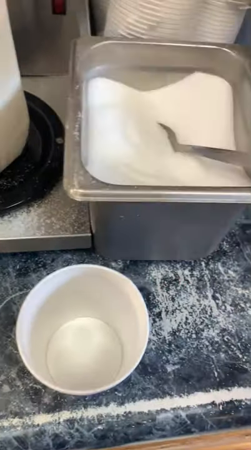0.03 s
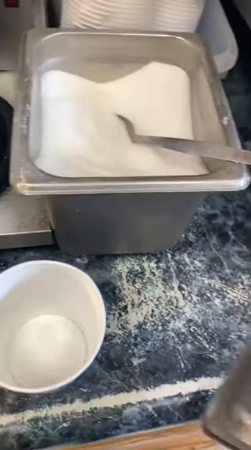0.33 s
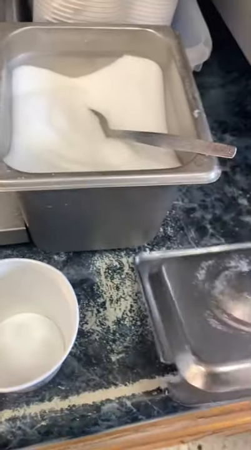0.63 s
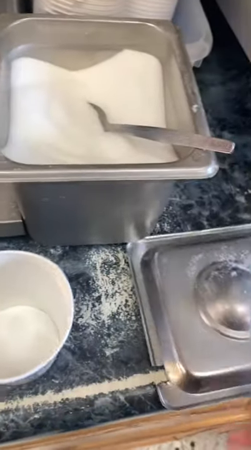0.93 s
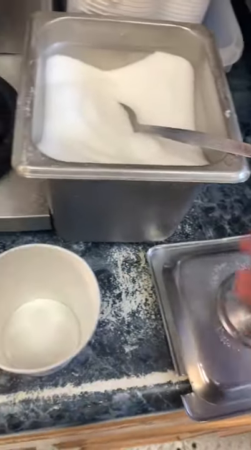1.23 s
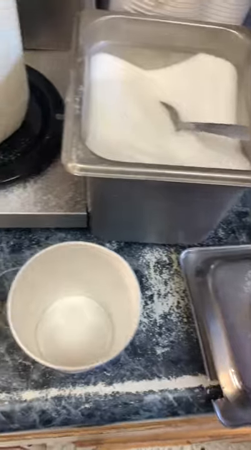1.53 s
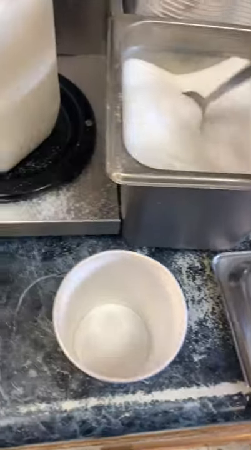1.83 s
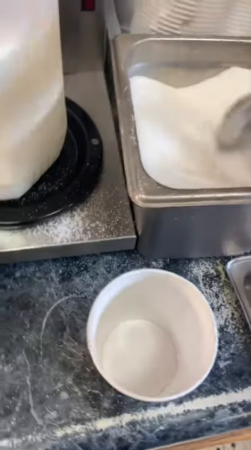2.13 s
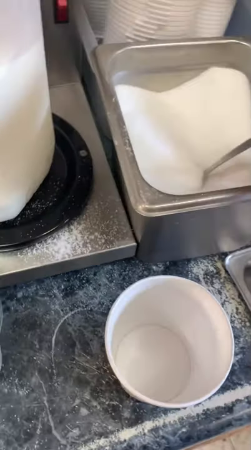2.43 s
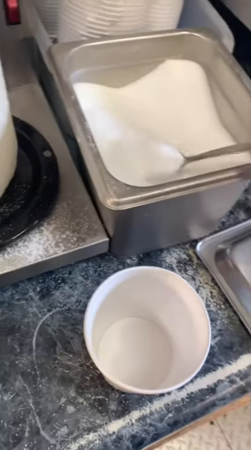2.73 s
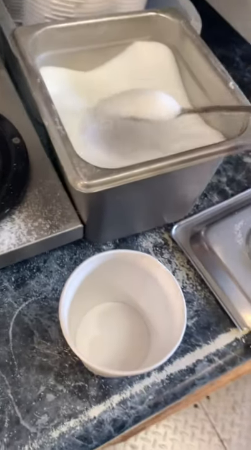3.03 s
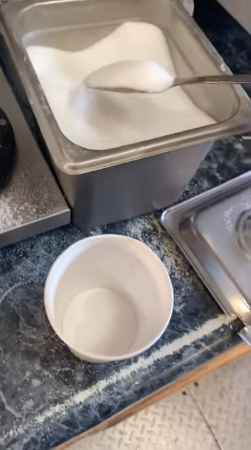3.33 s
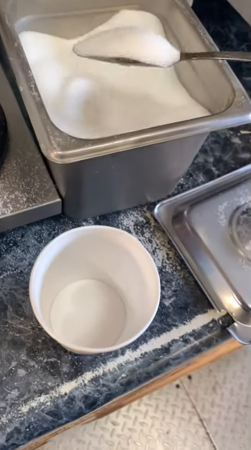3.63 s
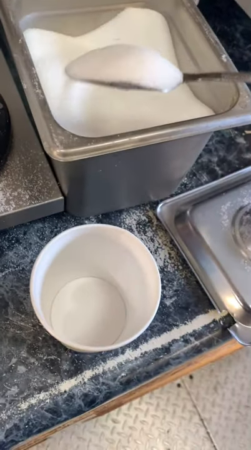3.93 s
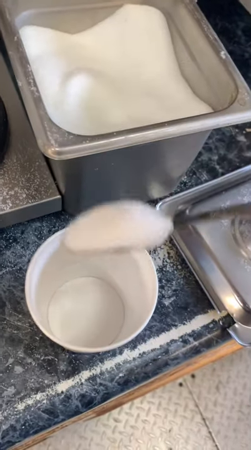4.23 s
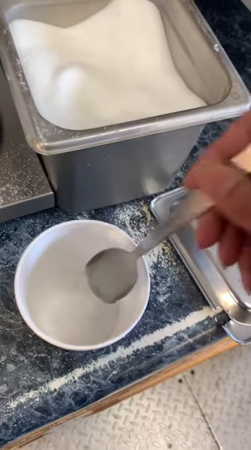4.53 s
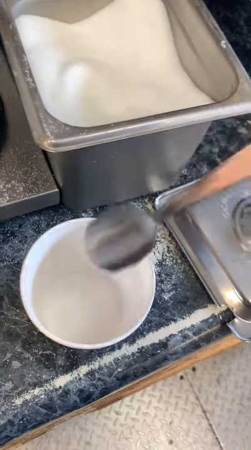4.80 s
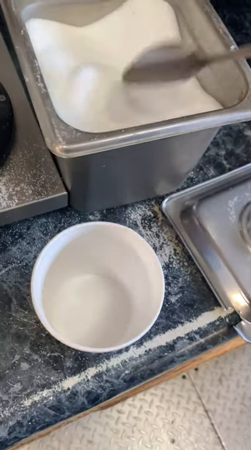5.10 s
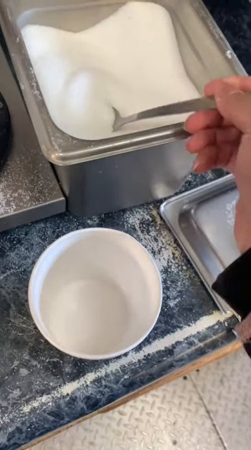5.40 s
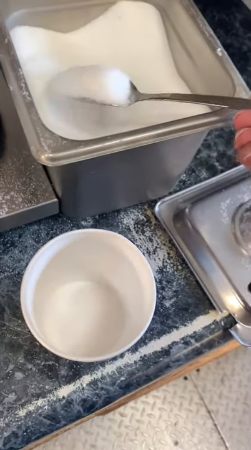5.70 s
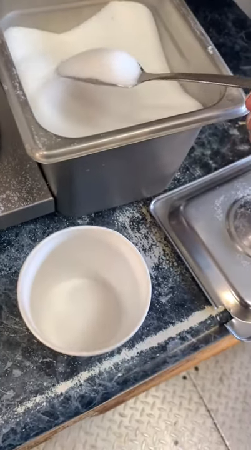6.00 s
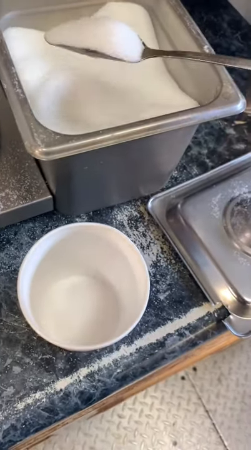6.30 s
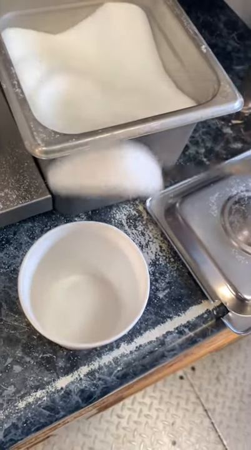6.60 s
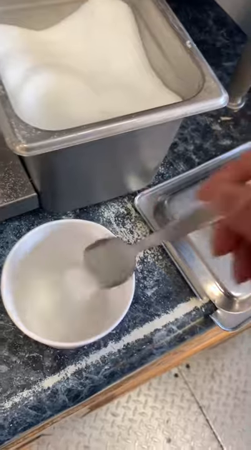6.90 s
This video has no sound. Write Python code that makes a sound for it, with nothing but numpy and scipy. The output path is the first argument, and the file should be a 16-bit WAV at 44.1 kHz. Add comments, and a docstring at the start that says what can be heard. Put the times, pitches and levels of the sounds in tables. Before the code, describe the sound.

A low refrigerator and fan hum runs throughout in a small shop, with all the action close to the microphone. At about 0.5 seconds a steel lid hits a stone counter, clanging, skidding and rocking in a quick, bright rattle. It clanks loudly again around 1 second and is choked by a hand; this is the loudest event. A light tick follows near 1.4 seconds. From about 2 to 2.9 seconds a spoon crunches softly into sugar in a steel pan, strongest near 2.5. Faint dry arm rustling follows. Between 4.2 and 4.6 seconds sugar falls into a paper cup, hissing, ticking and drumming lightly on the bottom. The spoon digs again around 5.2 seconds, then grainy rustling grows from 5.5 to 6.5. Near 6.7 seconds a few sharp crystal ticks begin a second, lighter pour that lasts to about 7 seconds.

```python
"""A steel lid drops on a stone counter, clangs, skids and rocks until a palm presses it flat and chokes it.
A spoon then crunches into a steel pan of sugar, two main scoops, and tips each into a paper cup:
crystals hiss and tick, the paper bottom drums, and a dry rustle follows the arm.
It is all close up, over a bed of refrigerator and fan hum in a small shop."""
import sys
import numpy as np
from scipy import signal
from scipy.fft import rfft, irfft, next_fast_len
from scipy.io import wavfile
from scipy.ndimage import map_coordinates

SR = 44100
rng = np.random.default_rng(int(sys.argv[2]) if len(sys.argv) > 2 else 0)


def log_audio(samples):
    """Write samples as a 16-bit WAV file to the path given in sys.argv[1]."""
    # one column per channel
    frames = np.atleast_2d(samples).T
    # limit to full scale, then quantise
    limited = np.clip(frames, -1, 1)
    pcm = np.round(limited * 32767).astype(np.int16)
    wavfile.write(sys.argv[1], SR, pcm)


N = 306495
TIME = np.arange(N) / SR

# Table levels are relative: each layer gets its own gain in the mix.
# lid hits on the stone: t/s, ring/dB, hardness/dB, thud/dB, knock/dB, knock f/Hz
LID_HITS = [(0.46, -40.5, 2, -41.5, -33.5, 1064), (.502, -22.5, 9, -16.5, -27.5, 1236),
            (.510, -27, 0, -24.5, -40, 1260), (0.545, -24.5, -6, -31.5, -48, 1240),
            (0.579, -29.5, 6.5, -23, -35, 960), (0.587, -28, 6.5, -31.5, -25, 954),
            (.604, -29, 12.5, -20, -14, 960), (0.624, -26, 5, -27, -19.5, 1084),
            (0.647, -23, -22, -34.5, -22.5, 930), (.660, -22.5, -21, -40.5, -24, 870),
            (0.683, -23, -8.5, -44.5, -32, 850), (.714, -21.5, -2.5, -34, -14.5, 956),
            (.746, -28.5, -14, -48, -38, 960), (.779, -29.5, 4, -54, -18, 1032),
            (.798, -33, -26, -62, -31, 890), (0.947, -31.5, 6.5, -40, -38, 760),
            (.953, -24, -8, -25, -16.5, 790), (0.96, -18, 4, -25, -14.5, 750),
            (0.965, -10.5, -5.5, -37.5, -49, 790), (0.979, -19.5, 0, -45, -33, 766),
            (0.995, -20, -2, -28, -19.5, 735), (1.015, -13.5, -8, -29, -23, 774),
            (1.024, -23, -1.5, -39, -22.5, 786), (1.056, -22.5, -10, -50, -33, 805),
            (1.087, -45, 1.5, -38, -33, 750), (1.146, -53, 1.5, -52, -34, 766)]
# the lid's main modes: f/Hz, level struck on edge/dB, level lying flat/dB, free t60/s
LID_MODES = [(399.5, -21.5, -24, .86), (958, -13, -20, .25), (1147, -14, -20, .35), (1313, -10, -6.5, .4),
             (1447, -20, -10, .3), (1577, -16, 4.5, .42), (1610, -15, -1, .3), (1655, -10, -5, .24),
             (1695, -13, -6, .3), (1725, -15, -9, .7), (1785, -11, -6, .3), (1870, -11, -12, .22),
             (1958, -1.5, -8, .25), (2010, -6, -10, .3), (2290, -16, -7, .25), (2437, -13, -7, .35),
             (2934, -4, -14, .2), (3002, -8, 2.5, .4), (3080, -6, -12, .18), (3225, 0, -17, .16),
             (3500, -6, -10, .26), (3735, -10, -8, .25), (3915, -7, -14, .25), (3984, -7, -14, .25),
             (4060, -8, -15, .3), (4172, -5, -16, .25), (4430, -6, -15, .18), (4780, -12, -8, .11),
             (4934, -1, -15, .16), (5400, -6, -20, .2), (5575, -5, -14, .2), (6023, 0, -14, .15),
             (6196, 1, -15, .14), (6438, 0, -14, .17), (6724, -6, -11, .15), (7165, -4, -14, .15),
             (7270, -7, -13, .2), (7700, -6, -13, .15), (8091, -4, -13, .19), (8400, -8, -13, .13)]
# the lid settling: t/s, flatness (0 on edge, 1 pressed flat)
LID_FLATNESS = [(.62, 0.014), (.72, 0.79), (.96, 0.89)]
# modes of the rim's knock: multiple of its pitch, level/dB
KNOCK_MODES = [(.5, -16), (.8, -8), (1.001, -1.5), (1.2, -9), (1.45, -10), (2, -10.5), (3.3, -26.5),
               (6, -30)]
# spoon digs: entry t/s, stop t/s, push length/s, entry crunch/dB, push crunch/dB, pan/dB
SPOON_DIGS = [(2.012, 2.084, 0.03, -58.5, -55, -80), (2.25, 2.462, 0.27, -48.5, -38, -45.5),
              (2.778, 2.847, 0.073, -51.5, -60.5, -55.5), (5.15, 5.312, 0.13, -48, -39.5, -44.5)]
# sugar clumps landing in the cup: t/s, hiss/dB, cup/dB, t60/s
SUGAR_CLUMPS = [(4.214, -39.5, -57.5, 0.5), (4.278, -30, -47.5, 0.32), (4.341, -34, -54.5, 0.32),
                (4.397, -32.5, -46.5, 0.42), (4.445, -39, -56, 1), (4.499, -29, -43, .15),
                (4.51, -27.5, -33.5, 0.23), (4.538, -25.5, -52, 0.29), (4.585, -45, -77, 0.082),
                (6.699, -44, -79, 1), (6.719, -46, -59, 0.059), (6.75, -40.5, -78, 0.84),
                (6.785, -45.5, -78, 0.86), (6.882, -40.5, -57, 0.91), (6.932, -34.5, -51, 0.8)]
# single crystals and light spoon touches: t/s, level/dB, brightness/(dB per octave)
TICKS = [(0.161, -37.5, 1), (1.4047, -27, 1.5), (1.472, -33, -8), (3.0617, -46.5, 0), (3.347, -32, -2),
         (3.928, -42.5, -5), (4.205, -33.5, 0), (4.274, -30.5, -2), (4.342, -34, 3), (4.350, -39, 1),
         (4.507, -20, 0), (5.1577, -33.5, 7.5), (6.638, -40, 1), (6.649, -49.5, -2), (6.685, -25, 11),
         (6.709, -38, -5), (6.719, -37, 0), (6.917, -28.5, 2)]
# arm moves, and near 0.92 s the lid sliding on the stone: fastest t/s, level/dB, rise/s, t60/s
ARM_MOVES = [(.035, -42, 0.11, 0.36), (.165, -56.5, 0.085, 1.4), (.46, -52, 0.11, 0.22),
             (.92, -43, 0.06, 0.98), (1.155, -49.5, 0.01, 1.6), (1.409, -47.5, 0.075, 1.6),
             (1.538, -38, 0.062, 0.082), (1.66, -57.5, 0.073, 5.6), (1.97, -55, 0.041, .25),
             (3.226, -55.5, 0.022, 0.41), (3.31, -50, 0.046, 1.3), (3.47, -50.5, 0.11, 0.46),
             (3.606, -41.5, 0.05, 0.4), (3.70, -47.5, 0.15, 0.81), (4.078, -44, 0.12, 0.81),
             (4.771, -62.5, 0.071, 0.86), (5.462, -49.5, 0.12, .4), (5.518, -34, 0.069, 0.38),
             (5.625, -45, 0.027, 0.25), (5.765, -40.5, 0.053, 2), (5.91, -38, 0.05, 1.4),
             (5.989, -33.5, 0.15, 0.76), (6.13, -30.5, 0.066, 0.29), (6.368, -37.5, 0.058, 1.2),
             (6.51, -45, 0.042, 0.25), (6.58, -44, .03, 0.15)]
# compressor and fan tones: f/Hz, level/dB, wander/Hz
MOTOR_TONES = [(97.8, -43, 2.81), (116, -45.5, 0.25), (182.6, -55, 0.35), (193.6, -43.5, 0.63),
               (202, -45.5, 0.32), (208.3, -52.5, 0.14), (217.8, -50, 0.072), (243.6, -60, 0.16),
               (281.3, -57.5, 0.64), (393.3, -58, 9.14), (973, -68, 12)]
# faint low swells: centre t/s, half length/s, f/Hz, level/dB
SWELLS = [(2.2, .4, 398, -51), (3.35, 0.28, 311, -49.5), (3.794, .25, 326, -49.5), (4.14, 0.2, 313, -47.5),
          (4.56, .25, 287.7, -52), (5.67, .17, 430, -46)]

# tone colours: f/Hz, level/dB
SHIMMER_EQ = [(1000, -11.5), (2000, 3), (2700, -3.5), (3900, 5), (4700, -10.5), (6500, -1), (8500, -5.5),
              (11000, -7.5), (14500, -18)]  # the lid's crowd of weaker modes
CRACK_EQ = [(300, -20.5), (1500, -12.5), (2600, -9), (4500, -3), (6400, 2), (8300, 1), (11000, -3),
            (14500, -11)]  # steel meeting stone
THUD_EQ = [(100, -17), (190, -8), (235, 3.5), (300, -5.5), (390, 0.5), (480, -6.5), (650, -41)]  # the counter's body
SKID_EQ = [(450, -1), (1200, -3), (1850, 0.5), (2450, 3.5), (3300, -0.5), (5600, -4), (9000, -12.5)]  # the rim scraping
CRUNCH_EQ = [(2500, -20), (4600, -9), (6000, 0.5), (7200, 1), (8800, 3), (10500, -6.5), (12500, -1),
             (13800, -5), (14800, -11)]  # crystals crushed against the spoon
PAN_EQ = [(300, -9), (700, 9.5), (1200, 7.5), (1850, 9.5), (2400, 9), (3100, 3), (4000, 7.5), (5000, -6),
          (7000, -30)]  # the steel pan's body
POUR_EQ = [(2500, -5.5), (4600, -2.5), (5800, -3), (7100, 9), (8800, 6), (10500, 2.5), (12300, -1),
           (14500, -6.5)]  # falling sugar
CUP_EQ = [(300, -15), (700, -11), (1150, -20), (1400, -3), (1680, 4), (1980, -1), (2200, -11), (2600, -4),
          (3000, -7), (3800, -3), (4150, -14), (6000, -30)]  # the cup's paper bottom
TICK_EQ = [(1500, -10.5), (3500, -3.5), (7200, 2.5), (11000, -3.5), (14500, -1.5)]  # one tiny contact
RUSTLE_EQ = [(250, 3), (600, -3), (720, -1.5), (1080, 2), (1400, -1.5), (1900, 0), (2130, -4), (2360, 1.5),
             (2700, -2.5), (3060, -2.5), (3400, -1.5), (4050, -0.5), (4500, -2), (5800, -4), (6600, -2),
             (8500, -4), (11500, -11), (14500, -15.5)]  # the moving arm
AIR_EQ = [(20, -31), (48, -2), (75, 0), (135, 0), (160, -11), (230, -5.5), (310, -13.5), (410, -11.5),
          (580, -18.5), (950, -21), (1300, -28), (1900, -30.5), (2300, -29), (2900, -39.5), (7000, -49),
          (14000, -61)]  # moving air
FAR_TAIL_EQ = [(300, -7), (1600, -3.5), (3000, -9.5), (6000, -22.5), (12000, -41)]  # the shop's far reverb

# stereo width at the counter and in the room: f/Hz, likeness (0 wide, 1 mono)
NEAR_LIKENESS = [(200, 1), (1000, 0.54), (3000, 0.43), (6500, 0.93), (12000, 1)]
ROOM_LIKENESS = [(150, 1), (370, 0.15), (900, 0.099), (3000, 0.58), (6500, 0.84)]
# stereo lean of the counter and of the machines: f/Hz, left minus right/dB
NEAR_BALANCE = [(250, -2), (700, -3), (2000, -2.6), (4500, -1), (8000, 0)]
MACHINE_BALANCE = [(60, 0), (150, -5), (370, -2.5), (940, 1.5), (2340, 1), (5840, 0.5), (14600, 1.5)]
# phase across the microphone pair, and the extra from the lid lying to the right: f/Hz, left lead/rad
MIC_PHASE = [(400, 0), (2000, .8), (3000, 2.1), (4000, 1.7), (5200, 3.3), (6100, 6.2), (7500, 6.3),
             (9400, 9.4), (10100, 9.5), (11600, 12.5), (13200, 12.6), (14200, 15.7)]
LID_PHASE = [(300, 0), (900, -2), (1600, -.4), (2000, -.4), (2400, -3.6), (3050, -3.7), (3800, -6.28)]

SPLIT = np.array([[.5], [-.5]])  # shares a phase gap between left and right


def lid(crack_db=2.5, crack_per_hardness=1.46):
    """Each hit rings the steel and stacks three transients: contact crack, counter thud, rim knock."""
    out = lid_ring()
    for s, ring_db, hard_db, thud_db, knock_db, knock_hz in LID_HITS:
        add(out, s, from_db(ring_db + crack_db + crack_per_hardness * hard_db) * burst(CRACK_EQ, t60=0.06))
        add(out, s, from_db(thud_db) * burst(THUD_EQ, t60=0.09))
        add(out, s, from_db(knock_db) * rim_knock(knock_hz))
    return out


def lid_ring(span_s=(.45, 1.5), step_s=.001, waver_db=1.8, wavers_per_s=70, buzz_db=1.8, level_db=-5.0):
    """The loose rim chatters on stone: each mode wavers in pitch and level, and the whole sheet buzzes."""
    modes = np.vstack([LID_MODES, shimmer_modes()])
    steps, t = np.arange(*span_s, step_s), np.arange(*span_s, 1 / SR)
    energy = mode_energy(modes, steps, step_s)
    ringing, out = np.zeros((2, len(t))), np.zeros((2, N))
    for hz, swing in zip(modes[:, 0], np.sqrt(energy.T)):
        waver_hz = 9 * np.sqrt(hz / 1600)
        pitch = hz + waver_hz * drift(wavers_per_s, steps)
        phase = np.interp(t, steps, 2 * np.pi * (np.cumsum(pitch) * step_s + rng.random()))
        # each mode radiates in its own pattern, so left and right catch it out of step
        apart = (lid_lead(hz) + 0.53 * rng.standard_normal()) * SPLIT
        envelope = np.interp(t, steps, swing * from_db(waver_db * drift(wavers_per_s, steps)))
        ringing += envelope * np.sin(phase + apart)
    add(out, t[0], ringing * from_db(level_db + buzz_db * drift(330, t)))
    return out


def shimmer_modes(count=105, level_db=-19.5, t60=0.59):
    """A crowd of weak, unevenly spaced modes gives the steel its sheen."""
    hz = np.linspace(1100, 14200, count) + rng.uniform(-55, 55, count)
    db = at_hz(SHIMMER_EQ, hz) + level_db
    return np.c_[hz, db, db, np.full(count, t60)]


def mode_energy(modes, steps, step_s, flat_db_per_s=106.0, palm_db_per_s=270, palm_s=(0.93, 1.5)):
    """Hits feed the modes; lying flat the lid rings lower and shorter, and the palm chokes it."""
    hz, edge_db, flat_db, t60 = modes.T
    flat = np.interp(steps, *np.transpose(LID_FLATNESS))
    treble = np.interp(np.log(hz), np.log([1900, 5600]), [0, 1])  # harder hits ring brighter
    energy = np.zeros((len(steps), len(hz)))
    for s, ring_db, hard_db, *_ in LID_HITS:
        i = np.searchsorted(steps, s + step_s)
        colour_db = edge_db + flat[i] * (flat_db - edge_db) + hard_db * treble
        energy[i] += from_db(ring_db + colour_db + rng.standard_normal(len(hz))) ** 2
    palm_on, palm_off = palm_s
    palm = np.interp(steps, [palm_on - step_s, palm_on, palm_off, palm_off + step_s], [0, 1, 1, 0])
    choking = flat_db_per_s * flat + palm_db_per_s * palm
    for i in range(1, len(steps)):
        energy[i] += energy[i - 1] * from_db(-(60 / t60 + choking[i]) * step_s) ** 2
    return energy


def rim_knock(pitch_hz, t60=0.045, attack_s=0.0008):
    """A tight clack on the stone: a few damped modes, pitched by where the rim lands."""
    t, out = np.arange(SR // 7) / SR, 0
    for multiple, db in KNOCK_MODES:
        hz = multiple * pitch_hz
        phase = 2 * np.pi * (hz * t + rng.random())
        out += np.sqrt(2) * from_db(db) * np.sin(phase + lid_lead(hz) * SPLIT)
    return out * from_db(-60 * t / t60) * (1 - np.exp(-t / attack_s))


def rim_skid(level_db=-32.5):
    """The tilted rim scrapes and rattles along the stone among the first hits."""
    grit = grains(SKID_EQ, per_s=900, spread_db=3.0, clump_db=2.5, off_axis=-1.8)
    return from_db(level_db) * stroke(.56, rise_s=.055, t60=0.52) * shifting(grit, depth_db=5.0)


def spoon_digs(bite_s=0.021, stop_t60=0.055, crunch_db=-4.0, pan_db=2.0):
    """The spoon bites in, crunches and pushes until it stops; the pan adds body under the push."""
    crushing, pressure = [], []
    for enters, stops, push_s, entry_db, push_db, body_db in SPOON_DIGS:
        bite = np.clip((TIME - enters) / bite_s, 0, 1)
        release = from_db(-60 * np.clip((TIME - stops) / stop_t60, 0, 2))
        push = stroke(stops, push_s, stop_t60)
        crushing += [from_db(entry_db) * bite * release, from_db(push_db) * push]
        pressure.append(from_db(body_db) * push)
    crunch = grains(CRUNCH_EQ, per_s=4500, spread_db=2.5, clump_db=2.0)
    pan = shifting(grains(PAN_EQ, per_s=1200, spread_db=2.5, clump_db=1.0), depth_db=4.0)
    return from_db(crunch_db) * power_sum(crushing) * crunch + from_db(pan_db) * power_sum(pressure) * pan


def sugar_pour(landing_s=.016, hiss_db=-5.0, cup_db=6.5):
    """Sugar patters in clumps on the cup's paper bottom, which drums near 1.7 kHz."""
    falling = power_sum(from_db(db) * stroke(s, landing_s, t60) for s, db, _, t60 in SUGAR_CLUMPS)
    drumming = power_sum(from_db(db) * stroke(s, landing_s, t60) for s, _, db, t60 in SUGAR_CLUMPS)
    hiss = shifting(grains(POUR_EQ, per_s=3000, spread_db=2.6, clump_db=1.0), depth_db=3.5)
    cup = shifting(grains(CUP_EQ, per_s=1400, spread_db=2.5, clump_db=1.8), depth_db=3.5)
    return from_db(hiss_db) * falling * hiss + from_db(cup_db) * drumming * cup


def ticks():
    """Tiny contacts: crystals on steel are bright, touches on paper duller."""
    out = np.zeros((2, N))
    for s, db, bright_db in TICKS:
        colour = [(hz, level + bright_db * np.log2(hz)) for hz, level in TICK_EQ]
        add(out, s, from_db(db) * burst(colour, t60=0.011, attack_s=0.0001))
    return out


def arm_rustle(level_db=-0.5):
    """A dry, grainy rustle rides the arm's speed as it reaches and levels the spoon; the same texture carries
    the lid's slide on the stone near 0.92 s."""
    speed = power_sum(from_db(db) * stroke(s, rise_s, t60) for s, db, rise_s, t60 in ARM_MOVES)
    texture = grains(RUSTLE_EQ, per_s=5000, spread_db=2.2, clump_db=1.5, off_axis=1.8)
    return from_db(level_db) * speed * shifting(texture, depth_db=3.5)


def machines(air_db=-38.5, waver=0.37, width_rad=0.24):
    """Motors hum, each wandering in pitch and level, over the rumble of moved air."""
    air = stereo(rng.standard_normal((2, N)), AIR_EQ, off_axis=1.43, likeness=ROOM_LIKENESS)
    out = from_db(air_db) * air
    for hz, db, wander_hz in MOTOR_TONES:
        phase = 2 * np.pi * (np.cumsum(hz + wander_hz * drift(12)) / SR + rng.random())
        apart = width_rad * rng.standard_normal() * SPLIT
        out += np.sqrt(2) * from_db(db) * (1 + waver * drift(7)) * np.sin(phase + apart)
    return panned(out, MACHINE_BALANCE)


def swells(wander_hz=13):
    """Soft, unsteady tones fade in and out under the hum."""
    out, wander = np.zeros((2, N)), wander_hz * drift(30)
    for s, half_s, hz, db in SWELLS:
        during = np.abs(TIME - s) < half_s
        phase = 2 * np.pi * np.cumsum(hz + wander[during]) / SR
        fade = np.cos(np.pi / 2 * (TIME[during] - s) / half_s) ** 2
        out[:, during] += np.sqrt(2) * from_db(db) * fade * np.sin(phase)
    return out


def shop_reverb(x, near_t60=0.06, near_db=-6.5, far_t60=0.55, far_db=-32.0):
    """Close walls and shelves return a tight diffuse tail, the far room a faint, darker, longer one."""
    t = np.arange(SR // 2) / SR
    near = rng.standard_normal((2, len(t))) * from_db(-60 * t / near_t60) * (t > .004)
    far = stereo(rng.standard_normal((2, len(t))), FAR_TAIL_EQ, off_axis=0, likeness=ROOM_LIKENESS)
    far = far * from_db(-60 * t / far_t60) * (t > .02)
    tail = sum(from_db(db) * part / np.linalg.norm(part, axis=1, keepdims=True)
               for db, part in [(near_db, near), (far_db, far)])
    return x + signal.fftconvolve(x, tail, axes=1)[:, :N]


def burst(spectrum, t60, attack_s=0.0013):
    """One contact: coloured noise with a snap attack and a fast decay."""
    t = np.arange(SR // 7) / SR
    noise = stereo(rng.standard_normal((2, len(t))), spectrum, off_axis=-2.1)
    return noise * from_db(-60 * t / t60) * (1 - np.exp(-t / attack_s))


def grains(spectrum, per_s, spread_db, clump_db, off_axis=1.0):
    """Granular texture: random collisions of uneven size, bunched in small clumps."""
    draw = rng.random((2, N)) * SR / per_s
    born = draw < 1
    clicks = np.zeros((2, N))
    clicks[born] = from_db(spread_db * np.minimum(-np.log(draw[born] + 1e-9), 5))
    clicks *= rng.choice([-1, 1], (2, N))
    return stereo(clicks * from_db(clump_db * drift(90)), spectrum, off_axis)


def shifting(x, depth_db, per_s=45, width_hz=230):
    """As the point of contact moves, narrow resonances come and go; rms 1."""
    hz, t, spectra = signal.stft(x, SR, nperseg=512)
    grid = np.meshgrid(hz / width_hz, t * per_s, indexing="ij")
    colour = map_coordinates(rng.standard_normal((256, 512)), grid, order=1, mode="wrap")
    return rms_one(signal.istft(spectra * from_db(depth_db * colour), SR)[1][:, :N])


def stroke(s, rise_s, t60):
    """Envelope of one gesture: a smooth rise to its peak at time s, then a steady decay."""
    gain, during = np.zeros(N), slice(*np.searchsorted(TIME, [s - rise_s, s + t60]))
    t = TIME[during] - s
    rise = np.sin(np.pi / 2 * np.clip(1 + t / rise_s, 0, 1)) ** 2
    gain[during] = rise * from_db(-60 * np.maximum(t, 0) / t60)
    return gain


def stereo(pair, spectrum, off_axis, likeness=NEAR_LIKENESS):
    """EQ two unrelated signals and blend them as mid and side; rms 1."""
    n = next_fast_len(pair.shape[1])
    hz = np.arange(n // 2 + 1) * SR / n
    mid, side = rfft(pair, n) * from_db(at_hz(spectrum, hz))
    alike = at_hz(likeness, hz)
    mid, side = mid * np.sqrt(1 + alike), side * np.sqrt(1 - alike)
    # an off-axis source turns the midrange phase further
    lead = at_hz(MIC_PHASE, hz) + off_axis * np.interp(hz, [400, 600, 2500, 4000], [0, 1, 1, 0])
    left, right = mid + side, (mid - side) * np.exp(-1j * lead)
    return rms_one(irfft([left, right], n)[:, :pair.shape[1]])


def lid_lead(hz):
    """Radians by which a lid tone leads on the left."""
    return at_hz(MIC_PHASE, hz) + at_hz(LID_PHASE, hz)


def panned(x, balance):
    """Pan frequency by frequency."""
    n = next_fast_len(N)
    lean = at_hz(balance, np.arange(n // 2 + 1) * SR / n) / 2
    return irfft(rfft(x, n) * from_db([lean, -lean]), n)[:, :N]


def drift(per_s, t=TIME):
    """Random modulation, gliding to a new value per_s times a second; rms 1."""
    knots = rng.standard_normal(4000)
    return rms_one(np.interp(t * per_s, np.arange(len(knots)), knots))


def at_hz(points, hz):
    """Read a curve on a log-frequency axis."""
    f, value = np.transpose(points)
    return np.interp(np.log(np.maximum(hz, 1)), np.log(f), value)


def add(out, s, sound):
    """Mix a stereo sound in at time s."""
    i = max(round(s * SR), 0)
    out[:, i:i + sound.shape[1]] += sound[:, :N - i]


def power_sum(gains):
    """Overlapping streams of grains add in power."""
    return np.sqrt(sum(gain ** 2 for gain in gains))


def from_db(db):
    """Decibels to gain."""
    return 10 ** (np.asarray(db) / 20)


def rms_one(x):
    """Scale to unit power."""
    return x / np.sqrt(np.mean(x ** 2) + 1e-20)


def scene():
    """The counter action up front, in the shop's reverb, over the bed of hum."""
    counter = lid() + rim_skid() + spoon_digs() + sugar_pour() + arm_rustle() + ticks()
    return shop_reverb(panned(counter, NEAR_BALANCE)) + machines() + swells()


def record(dry, notch_hz=9800, notch_width_hz=2410, cutoff_hz=14200):
    """The microphone's dead band notches the treble; peaks are soft-clipped and the top is cut."""
    notched = signal.lfilter(*signal.iirnotch(notch_hz, notch_hz / notch_width_hz, fs=SR), dry)
    low_pass = signal.ellip(10, .2, 80, cutoff_hz, fs=SR, output="sos")
    return signal.sosfilt(low_pass, np.tanh(notched))


dry = scene()
out = record(dry)
log_audio(out)
```